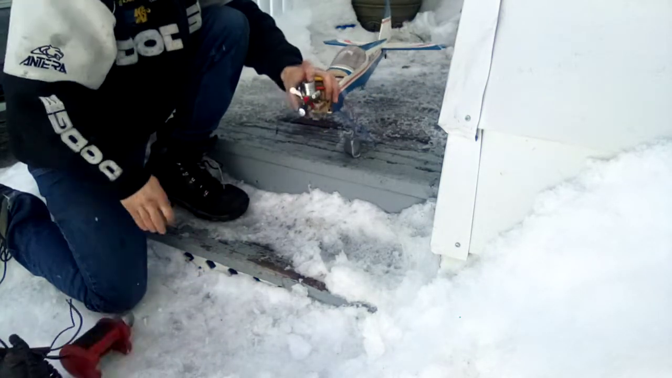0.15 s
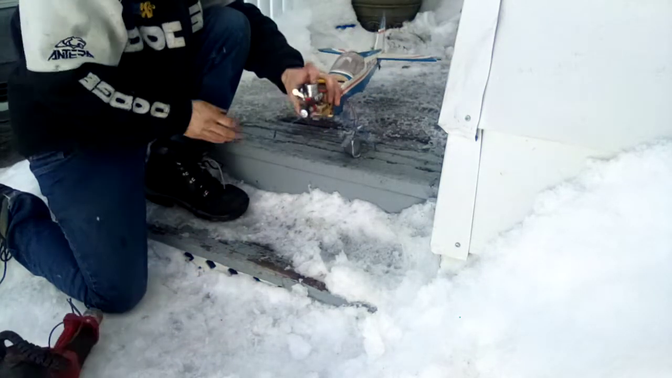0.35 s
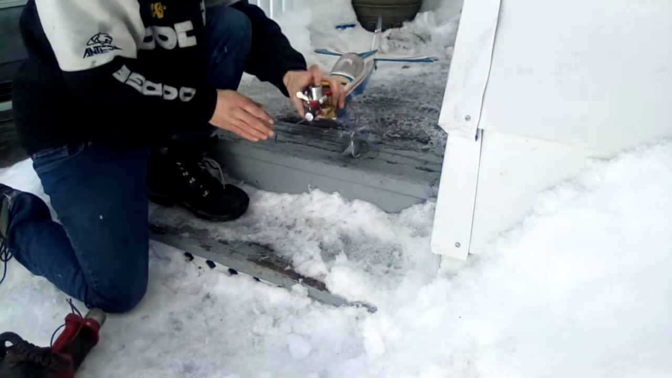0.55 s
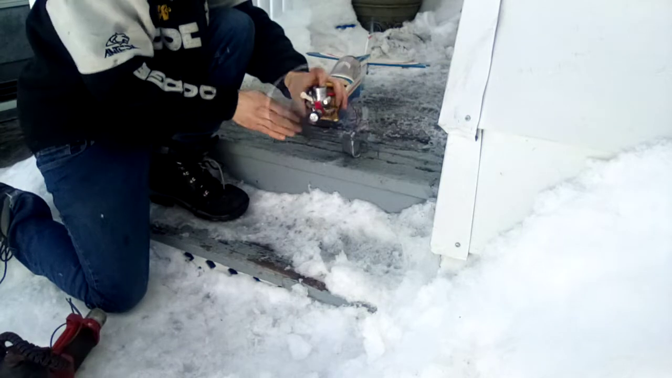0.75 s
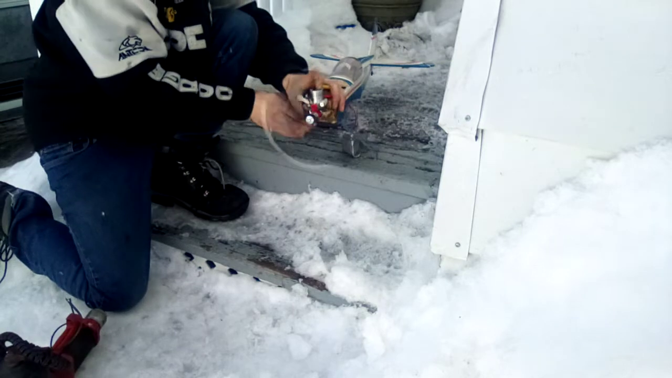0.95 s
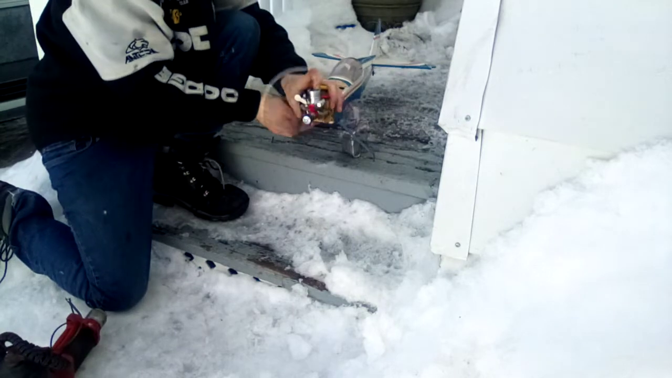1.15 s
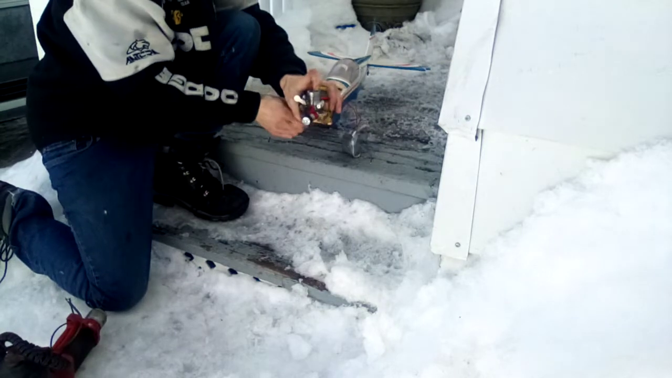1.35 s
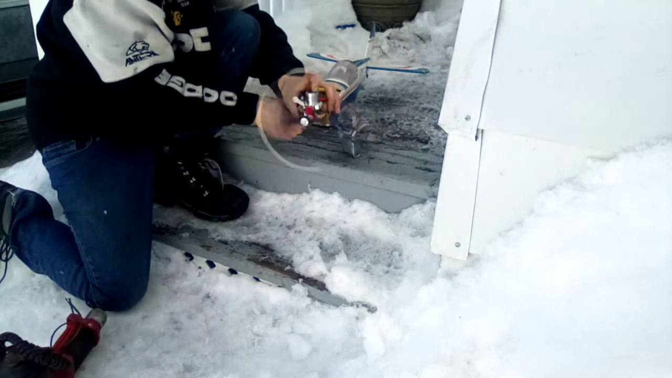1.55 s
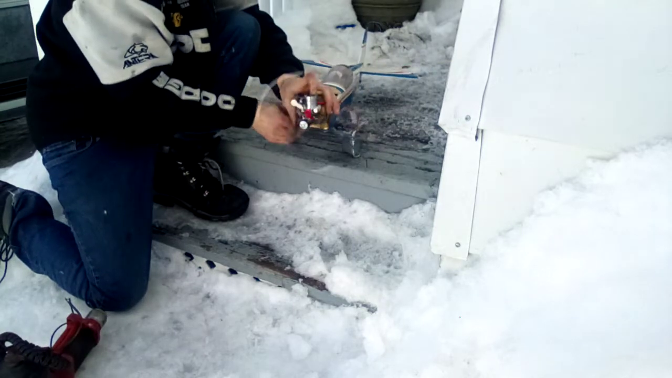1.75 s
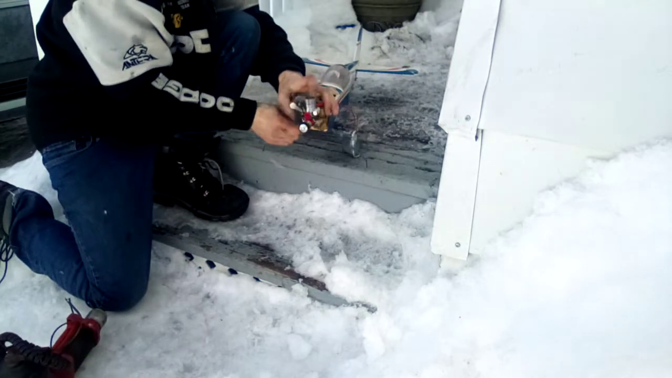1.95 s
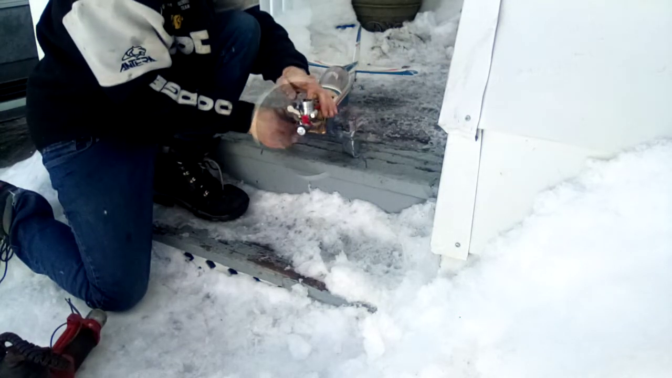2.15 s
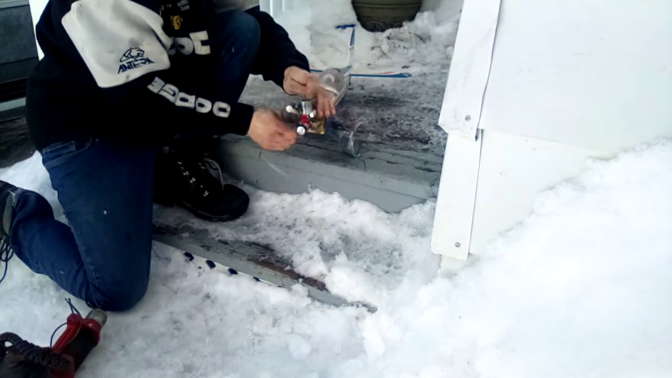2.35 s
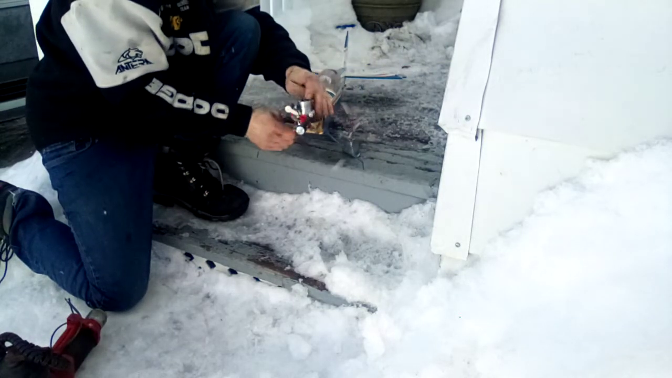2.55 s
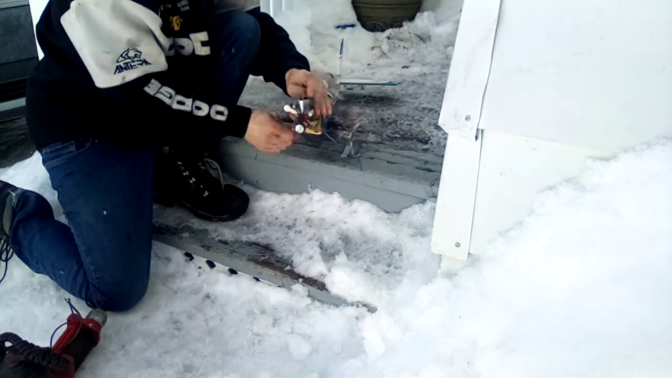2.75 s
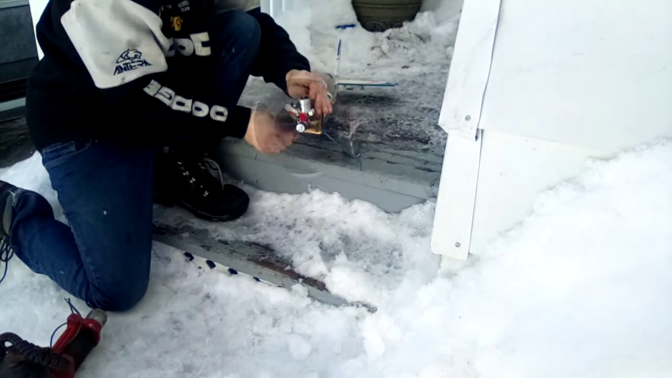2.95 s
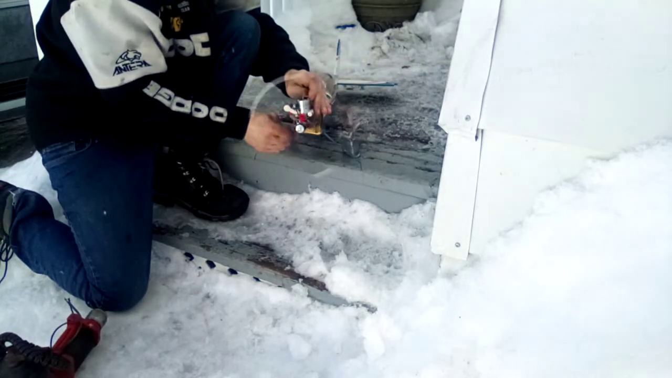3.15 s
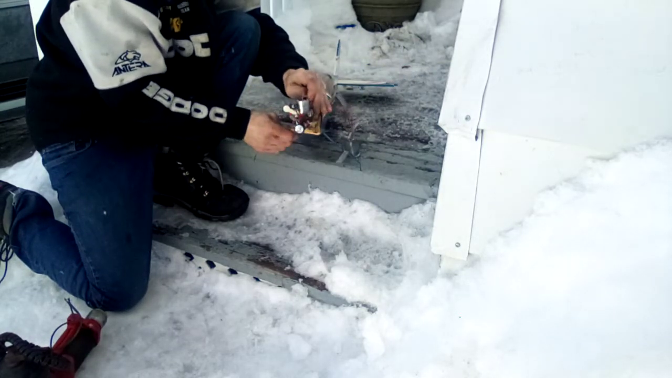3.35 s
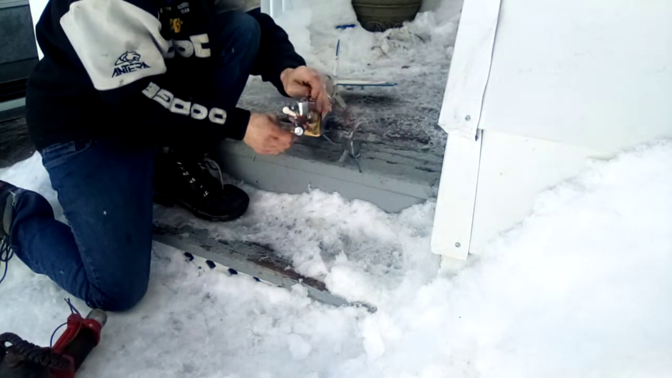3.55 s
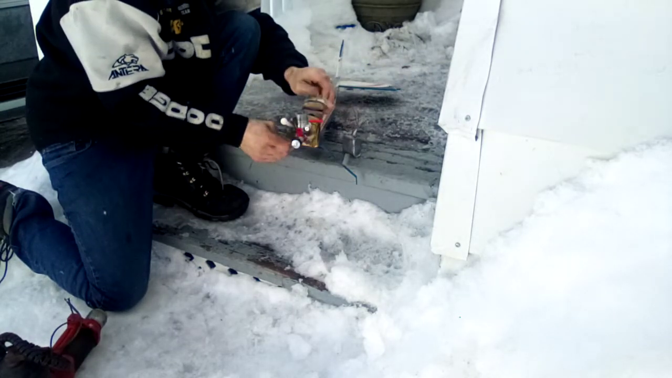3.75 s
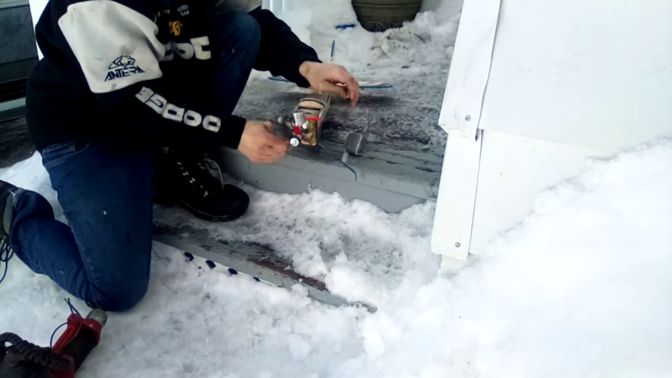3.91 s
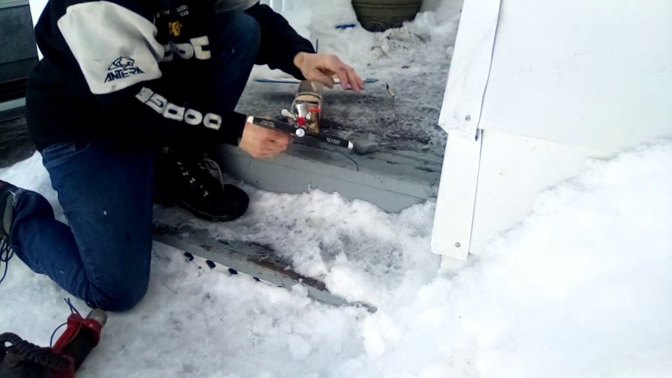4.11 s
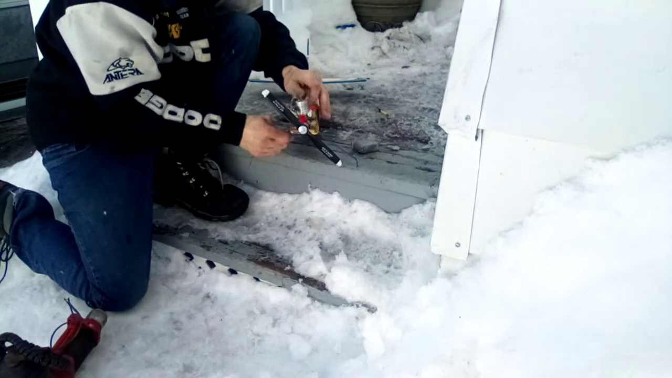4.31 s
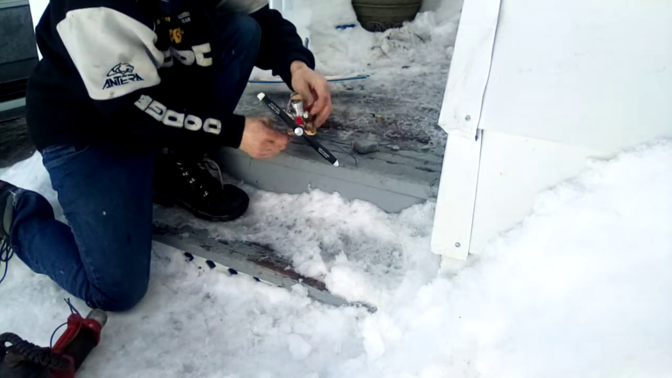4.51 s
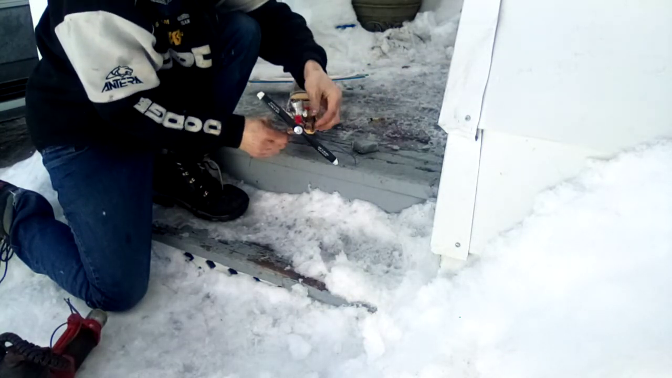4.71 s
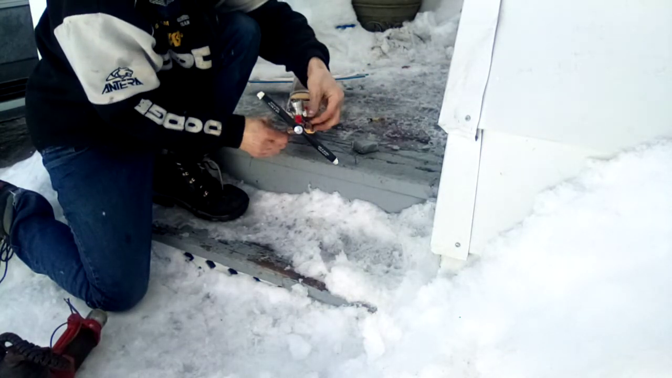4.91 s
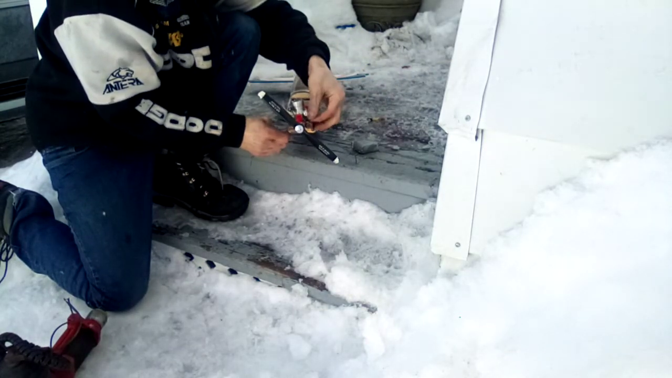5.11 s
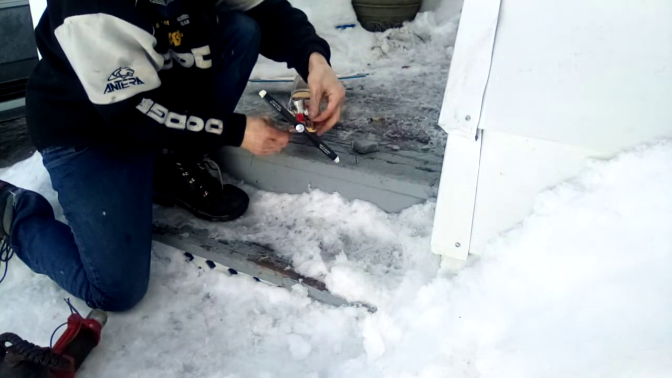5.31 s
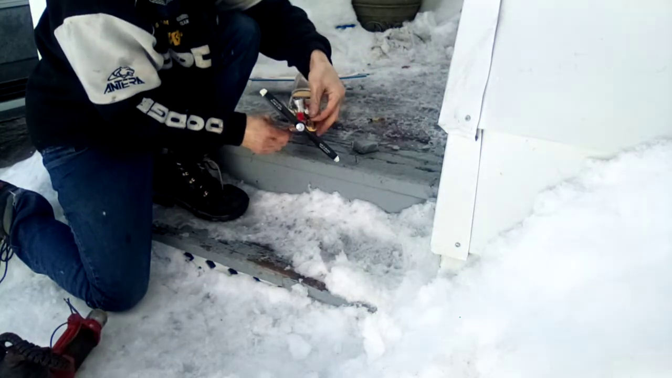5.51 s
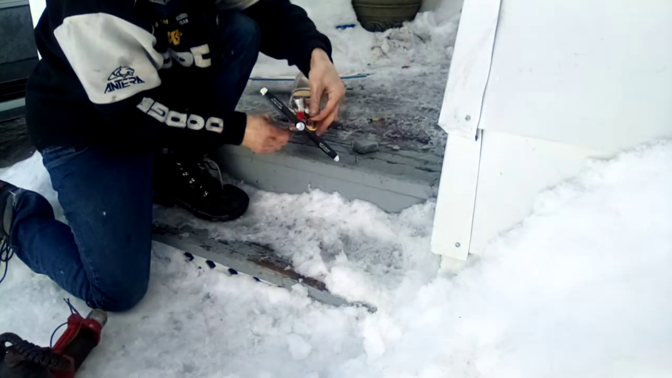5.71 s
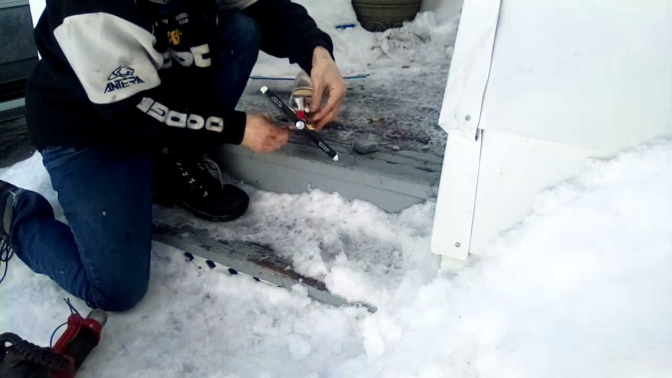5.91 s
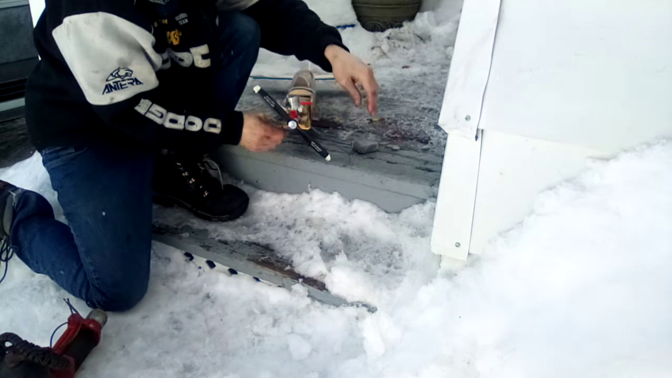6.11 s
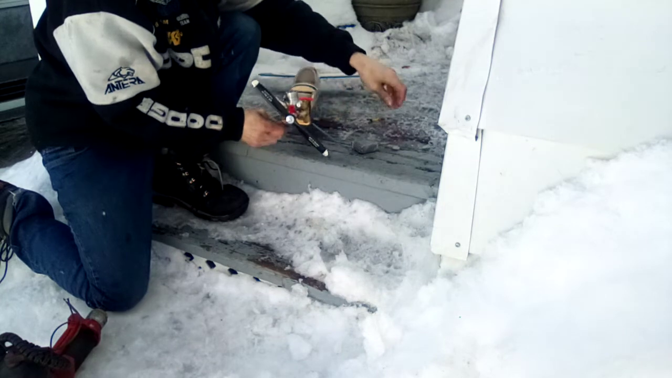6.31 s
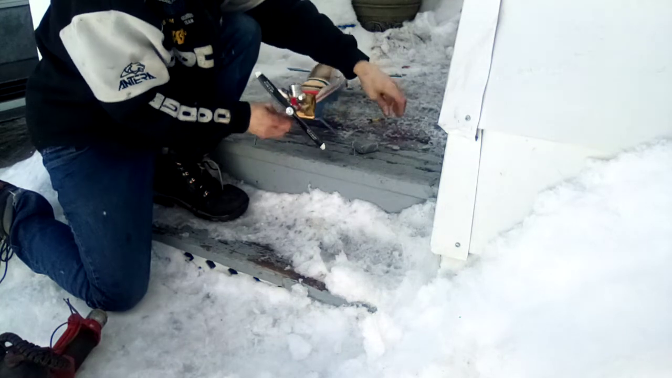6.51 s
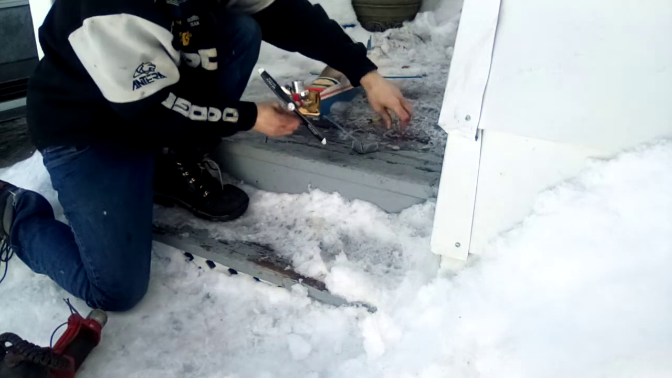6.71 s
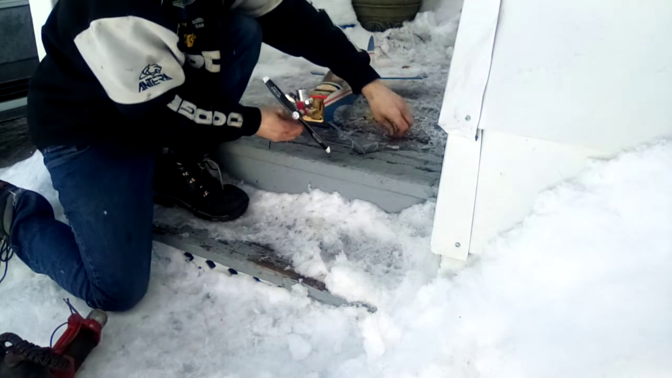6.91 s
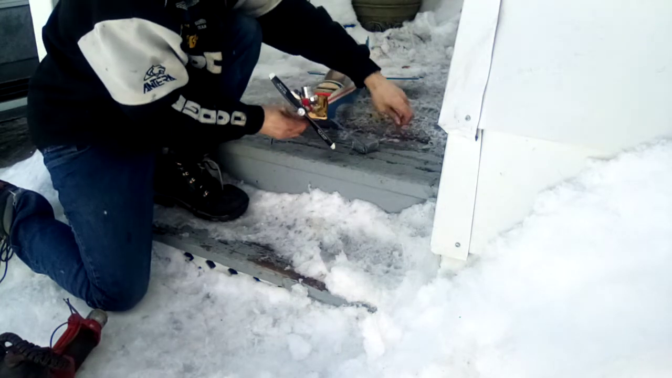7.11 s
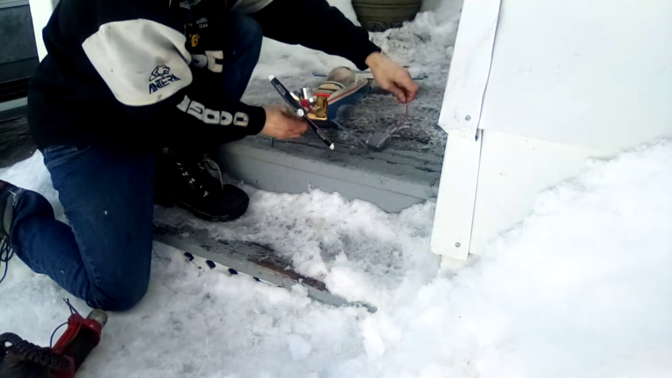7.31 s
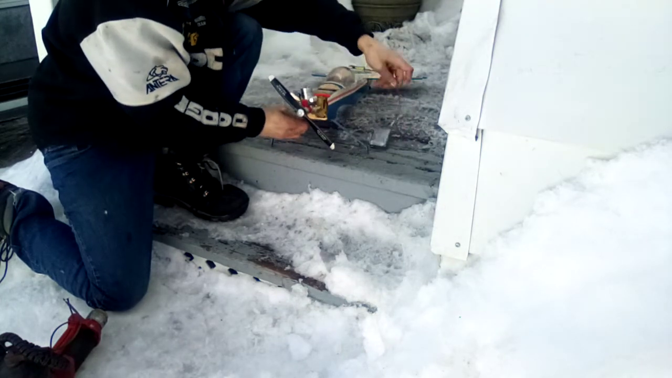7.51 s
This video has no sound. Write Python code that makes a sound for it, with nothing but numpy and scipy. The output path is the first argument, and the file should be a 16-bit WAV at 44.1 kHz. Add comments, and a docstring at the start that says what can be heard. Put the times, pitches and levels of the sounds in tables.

```python
"""A small two-stroke model aircraft engine runs rich on a snowy deck: sharp exhaust blasts, often every second
one weak. Pulses at each burn pass through a tail pipe, echoes and a ringing can; gas noise and propeller tones
follow the crank. A hand chokes it, and it coasts down in chuffs made of short fading tones and puffs of noise.
Then come a squeak from a bending whistle, clicks and scuffs from shaped noise, and knocks from ringing wood. A
quiet background noise, lifted slightly near 15 kHz, and a faint hum lie under everything."""
import sys
import numpy as np
from scipy import signal
from scipy.fft import rfft, irfft, next_fast_len
from scipy.io import wavfile
from scipy.ndimage import uniform_filter1d, map_coordinates

SR = 44100
rng = np.random.default_rng(int(sys.argv[2]) if len(sys.argv) > 2 else 0)


def generate_wav(signal):
    """Clip the signal to [-1, 1] and save it as 16-bit WAV at the path in sys.argv[1]."""
    frames = np.transpose(np.atleast_2d(signal))
    scaled = np.clip(frames, -1, 1) * 32767
    pcm = np.round(scaled).astype(np.int16)
    wavfile.write(sys.argv[1], SR, pcm)


N = 337806

# How fast the crankshaft spins. Each row: time in seconds, speed in turns per second.
SPEED = [(0.0, 102.38), (0.282, 97.4), (0.282, 99.04), (0.763, 90.43), (0.79, 92.71), (0.978, 92.06),
         (1.211, 85.52), (1.428, 91.73), (1.726, 81.58), (2.06, 85.44), (2.16, 90.12), (2.42, 88.79),
         (2.464, 86.91), (2.878, 84.76), (3.081, 88.88), (3.401, 84.85), (3.615, 89.17), (3.882, 80.2),
         (4.122, 17.22), (4.19, 1.0)]
CHOKE_S = 3.897  # the hand closes the intake, in seconds


def amp(db):
    """Turn dB into a plain factor."""
    return 10 ** (np.asarray(db) / 20)


def unit(x):
    """Scale a sound to rms 1."""
    return x / np.sqrt(np.mean(x ** 2) + 1e-20)


def curves(rows):
    """One value per sample for each column after the time."""
    s, *cols = np.transpose(rows)
    return [np.interp(np.arange(N) / SR, s, c) for c in cols]


def between(t0, t1, fade):
    """1 inside the span, 0 outside, with short ramps."""
    return np.interp(np.arange(N) / SR, [t0 - fade, t0, t1, t1 + fade], [0, 1, 1, 0])


def wobble(rate):
    """A smooth random curve with this many random points a second."""
    points = rng.standard_normal(int(N * rate / SR) + 4)
    return map_coordinates(points, [np.arange(N) * rate / SR])


def filtered(x, response):
    """Reshape x by a complex response given as a function of frequency."""
    m = next_fast_len(len(x) + 8192)
    f = np.fft.rfftfreq(m, 1 / SR)
    return irfft(rfft(x, m) * response(f), m)[:len(x)]


def noise(spectrum):
    """Noise of rms 1 with the given (Hz, dB) colour."""
    hz, db = np.transpose(spectrum)
    white = rng.standard_normal(N)
    return unit(filtered(white, lambda f: amp(np.interp(np.log(f + 1), np.log(hz + 1), db))))


def blend(spectra, hand):
    """Noise whose colour follows the hand from away (0) to near (1)."""
    return np.sqrt(1 - hand) * noise(spectra[0]) + np.sqrt(hand) * noise(spectra[1])


def band(f, hz, width):
    """One resonance that rings only after it is struck."""
    return 1j * f * width / (hz * hz - f * f + 1j * f * width)


def train(times, sizes):
    """Impulses that may fall between two samples."""
    at = times[:, None] * SR
    taps = np.floor(at) + np.arange(-7, 9)
    kernel = np.sinc(taps - at) * np.cos(np.pi * (taps - at) / 16) ** 2
    return np.bincount(taps.astype(int).ravel(), (sizes[:, None] * kernel).ravel(), N)[:N]


def add(out, s, sound):
    """Mix a short sound in at time s."""
    part = out[round(s * SR):][:len(sound)]
    part += sound[:len(part)]


def firings():
    """Time and strength (dB) of the burn in every turn; a poor burn also makes the next turns late."""
    # Stumbles, where every second turn burns badly.
    # Each row: first weak turn in seconds, number of weak turns, first loss in dB, last loss in dB.
    stumbles = [(.177, 1, -5, -7), (.238, 1, -2.5, -3.5), (.31, 2, -2.5, 0.5), (.371, 1, -5.5, -5.5),
                (.475, 2, -2, -2), (.527, 1, -2.5, -3), (.581, 5, -3, -2), (.689, 2, -10, -16),
                (.787, 1, -1.5, -3), (.863, 3, -16.5, -8), (.961, 5, -1.5, -6.5), (1.104, 7, -6.5, -2.5),
                (1.345, 3, -3, -5.5), (1.422, 2, -8, -13.5), (1.467, 1, -3, -3.5), (1.545, 9, -9, -9.5),
                (1.759, 2, -5.5, -4.5), (1.808, 2, -9, -6), (1.915, 3, -4.5, -2.5), (2.137, 1, -4, -3.5),
                (2.17, 2, -2.5, -2), (2.237, 4, -4.5, -4), (2.405, 7, -14.5, -4.5), (2.59, 2, -7.5, -4),
                (2.625, 8, -4.5, -6), (2.823, 1, -7, -10), (2.846, 3, -4, -1), (2.963, 2, -4.5, -7.5),
                (3.077, 8, -5.5, -2.5), (3.26, 6, -5.5, -7), (3.435, 2, -1.5, -1), (3.539, 14, -1, -10.5),
                (3.854, 2, -2, -12.5)]
    start_turn = -.9  # crank position at 0 s, in turns
    weak_scatter, choked_db = 0.21, -41  # spread as a share of a loss; what still burns once choked
    # delay in seconds that a lost burn costs; share of sag and of delay left a turn later
    lag_s, sag_kept, lag_kept = .00082, .7, .85
    turns = start_turn + np.cumsum(curves(SPEED)[0][:round(SPEED[-1][0] * SR)]) / SR
    times = np.interp(np.arange(int(turns[-1]) + 1), turns, np.arange(len(turns)) / SR)
    loss_db = np.zeros(len(times))
    for s, count, first_db, last_db in stumbles:
        weak = np.argmin(abs(times - s)) + 2 * np.arange(round(count))
        loss_db[weak] = np.linspace(first_db, last_db, len(weak))
    # the flywheel slows after a poor burn
    sag = signal.lfilter([0, 1 - sag_kept], [1, -sag_kept], 1 - amp(loss_db))
    times = times + lag_s * signal.lfilter([1], [1, -lag_kept], sag)
    loss_db = np.minimum(loss_db * rng.normal(1, weak_scatter, len(times)), 0)
    return times, np.where(times > CHOKE_S, choked_db, loss_db)


def exhaust(f, which):
    """Port to listener: tail pipe, then reflections (duller the longer their way) and the ringing can."""
    # The tail pipe, one row for hand away and one for hand near.
    # Each row: low mode in Hz, high mode in Hz, corner of the rounded front in Hz.
    pipe_rows = [(1080, 4790, 4300), (935, 4790, 4600)]
    # Reflections off deck, boot, hand and wall.
    # Each row: delay in milliseconds, gain with the hand away, gain with the hand near.
    echo_rows = [(0.18, 1.0, 0.83), (0.67, 0.49, 0.24), (0.84, 1.0, 0.86), (1.23, 0.35, 0.38),
                 (1.74, 0.22, 0.0), (1.86, 0.0, 0.63), (2.37, 0.45, 0.05), (3.05, 0.58, 0.44),
                 (3.68, 0.88, 0.39), (4.33, 0.73, 0.94), (4.92, 0.28, 0.0)]
    # Ringing of the silencer can.
    # Each row: pitch in Hz, width in Hz, level in dB with the hand away, level in dB with the hand near.
    can_rows = [(731, 158, 2, 3), (966, 60, -30, 3), (1335, 48, -2, -30), (1607, 111, 10, 5),
                (1773, 94, 8, -30), (2930, 456, 11, 5), (2520, 90, -30, 4), (3380, 260, -30, 0),
                (6050, 420, 0, 10)]
    low_hz, high_hz, front_hz = pipe_rows[which]
    pipe = band(f, low_hz, 500) * band(f, high_hz, 1375) / (1 + 1j * f / front_hz) ** 4
    echoes = sum(echo[1 + which] * np.exp(-2j * np.pi * f * echo[0] / 1000) / (1 + 1j * f * echo[0] / 2600)
                 for echo in echo_rows)
    can = sum(amp(mode[2 + which]) * band(f, *mode[:2]) for mode in can_rows)
    return pipe * (1 + echoes + can)


def exhaust_blasts(times, loss_db, hand):
    """A good burn leaves the port as a steep shock, a poor one as a later, rounder puff."""
    # The reaching arm throws the blast back. Each row: time in seconds, level in dB against the blast.
    arm_rows = [(.5, -25), (.7, -8.5), (1.04, -8.5), (1.12, -20.5), (1.9, -16.5), (2.15, -21.5)]
    arm_s = .00392  # delay of the arm's reflection, in seconds
    edge_scatter = 0.42  # some blasts are sharper than others
    weak_dulls = 1  # poor burns lose their edge
    scatter = rng.standard_normal((len(times), 3))
    missing = 1 - amp(loss_db)
    shock = train(times - .00015 + 1e-5 * scatter[:, 0], amp(1.2 * loss_db + .6 * scatter[:, 1]))
    puff = train(times + .0004, .33 * missing * (loss_db > -25))
    edge = train(times - .00015, (edge_scatter * scatter[:, 2] - weak_dulls * missing) * amp(1.2 * loss_db))
    sharp_edge = filtered(edge, lambda f: (1j * f / (1j * f + 2600)) ** 2)
    round_puff = filtered(puff, lambda f: 1 / (1 + 1j * f / 1500) ** 2)
    ports = shock + sharp_edge + round_puff
    grid = np.fft.rfftfreq(8192, 1 / SR)
    blasts = np.zeros(N)
    for which, share in enumerate([1 - hand, hand]):
        path = irfft(exhaust(grid, which))[:4096]
        blasts += signal.oaconvolve(ports * share, path)[:N]
    blasts = blasts / np.std(blasts[:4 * SR])
    thrown = filtered(blasts, lambda f: band(f, 1500, 1100) * np.exp(-2j * np.pi * f * arm_s))
    return blasts + amp(curves(arm_rows)[0]) * thrown


def gas_noise(since, burn, hand):
    """Turbulent exhaust gas and propeller wash: noise that swells at each burn and at each intake."""
    # Colour with the hand away, then near. Each row: frequency in Hz, relative level in dB.
    gas_spectra = [
        [(35, -54.5), (60, -20.5), (239, -34.5), (283, -23.5), (422, -20.5), (860, -6), (1450, -7), (1580, -10),
         (2030, -14.5), (2960, -9.5), (3810, -21), (4600, -9), (9000, -34), (11700, -70.5), (19800, -120)],
        [(35, -55), (60, -31), (207, -16), (255, -19.5), (388, -18), (955, -8.5), (1450, -8.5), (1610, -7),
         (1950, -14), (2450, -10), (3300, -6), (4000, -13), (6040, -13.5), (9000, -36), (11700, -60),
         (19800, -120)],
    ]
    intake = .6 * np.exp(-((since - .33) / 0.17) ** 2)
    swell = 1.0 + 0.28 * burn * np.exp(-since / 0.25) + intake
    gas = swell * amp(0.86 * wobble(150)) * blend(gas_spectra, hand)
    return amp(-13.5 + 3 * hand) * gas / np.std(gas)


def treble_hiss(since, burn, hand):
    """Intake and bearing hiss: it peaks at the blast and again when the intake opens."""
    # Colour with the hand away, then near. Each row: frequency in Hz, relative level in dB.
    hiss_spectra = [
        [(4410, -30.5), (7500, -4), (8820, -19.5), (9670, -5), (12100, -19), (13400, -14.5), (14900, 0.5),
         (16000, -7.5)],
        [(4120, -29.5), (7000, 7), (7580, -1), (8830, -10), (13200, -16), (14800, -7.5), (16000, -15.5)],
    ]
    flicker_db = 2.2  # unsteadiness of the hiss
    beats = 1.2 + 1.0 * burn * np.exp(-since / 0.15) + 0.88 * np.exp(-((since - .36) / 0.095) ** 2)
    return beats * burn ** 0.83 * amp(flicker_db * wobble(300)) * blend(hiss_spectra, hand)


def propeller_tones(angle):
    """Propeller and pumping tones at whole multiples of the shaft speed."""
    # Each row: multiple of the shaft speed, level in dB.
    blade_rows = [(1, -8), (2, -8.5), (3, 2.5), (4, -8), (5, -6.5), (6, -4)]
    smooth = uniform_filter1d(angle, size=2500)
    return sum(amp(db + 0.45 * wobble(10)) * np.sin(2 * np.pi * k * smooth) for k, db in blade_rows)


def thin_whistles(angle):
    """Thin wavering whistles at seventeen and nineteen times the shaft speed."""
    # Each row: time in seconds, level in dB against the blasts.
    whistle_rows = [(0, -17.5), (.6, -16), (1.04, -17.5), (1.08, -20.5), (3.9, -21.5)]
    level = amp(curves(whistle_rows)[0] + 2.5 * wobble(15))
    return level * sum(np.sin(2 * np.pi * k * angle) for k in (17, 19))


def engine(times, loss_db):
    """The running engine: blasts, gas, hiss and tones, all tied to the turning crank."""
    # Levels along the run. Each row: time in seconds, blast in dB, propeller in dB, treble hiss in dB.
    run_rows = [(0.03, -22, -45, -54.5), (0.9, -21.5, -41, -52), (1.2, -21.5, -41.5, -44.5),
                (1.76, -21.5, -40.5, -47.5), (2.07, -22, -37.5, -42), (2.44, -21, -38.5, -41.5),
                (3.79, -21, -38, -41.5), (3.92, -20.5, -45.5, -49.5)]
    # The hand closing in on the exhaust. Each row: time in seconds, nearness from 0 to 1.
    hand_rows = [(0, 0.03), (.6, 0.35), (1.2, 0.76), (1.9, 0.94), (2.4, 1), (3.9, 0.93)]
    blast_db, blade_db, hiss_db = curves(run_rows)
    hand = np.clip(curves(hand_rows)[0], 0, 1)
    angle = np.interp(np.arange(N) / SR, np.r_[-.0013, times], np.arange(len(times) + 1))
    since = angle % 1  # share of a turn since the last burn
    burn = amp(np.append(loss_db[:1], loss_db)[angle.astype(int)])
    running = between(0, 3.9, 0.039)
    gas = gas_noise(since, burn, hand) + thin_whistles(angle)
    exhaust_sound = amp(blast_db) * (exhaust_blasts(times, loss_db, hand) + gas * running)
    hiss = amp(hiss_db) * treble_hiss(since, burn, hand) * running
    return exhaust_sound + hiss + amp(blade_db) * propeller_tones(angle) * between(0, 3.93, 0.081)


def changing_colour(x):
    """The tone colour changes over time: four colourings, each lifting or dipping its own bands, blend in turn."""
    # Each row: centre in Hz, width in Hz, then the change in dB in the first, second, third and fourth colouring.
    colour_rows = [(95.7, 31, 6, 1, -1, -3), (397, 60, -3.5, -2, -11, -11), (602, 57, -3.5, 4.5, 4.5, 6),
                   (1078, 460, 1.1, -1, 2, 0.5), (1500, 110, 1, 6, 2, -0.3), (1650, 76, 0.5, -5, 4, 0.9),
                   (1796, 46, 4.5, -1.5, 2.5, 4), (1893, 28, -6, 9.5, 3.5, -0.7),
                   (2564, 200, -1.4, -10, -1, -2), (2033, 120, 0.5, -2.5, -5.5, -12.5),
                   (2370, 170, 1.6, 6.5, 4.5, 2.3), (2690, 120, -1.8, 5, 3, -5),
                   (2980, 150, 3.5, 3.5, 4, -2.15), (3790, 200, -2.5, -4.5, -4.5, -6),
                   (4586, 260, 1, 0.5, -11, -4), (5160, 200, 2.5, 3.5, -0.3, 1.6),
                   (5280, 140, 0.3, 0.9, -9, -4.5), (5520, 370, -1, -8.5, -12, -4.5),
                   (6000, 340, -6, -13, -1.7, 1.5), (6400, 490, 5, 6, -3, 1.4),
                   (7000, 930, 0.4, -3.5, -4, -7), (7800, 160, -0.6, -0.5, 5, 4.5),
                   (7820, 300, -2, -2.5, -5, -7), (8150, 180, -3, 1, 6, 5), (8796, 900, -2, -0.5, -4.5, -4),
                   (9700, 230, -2, 7, 5.5, 2.5)]
    # Each row: time in seconds, number of the colouring from 0 to 3.
    turn_rows = [(0, 0), (.58, 0), (.74, 1), (1.55, 1), (1.86, 2), (2.1, 2), (2.17, 3), (8, 3)]
    colouring, = curves(turn_rows)
    f = np.fft.rfftfreq(4096, 1 / SR)
    out = np.zeros(N)
    for k in range(4):
        bands = [1 + (amp(row[2 + k]) - 1) * band(f, *row[:2]) for row in colour_rows]
        share = np.clip(1 - abs(colouring - k), 0, 1)
        out += share * signal.oaconvolve(x, irfft(np.prod(bands, axis=0)))[:N]
    return out


def background():
    """Steady background noise, its colour lifted slightly near 15 kHz, swaying slightly, and a faint two-pitch
    hum far off."""
    # Colour of the background noise. Each row: frequency in Hz, relative level in dB.
    background_spectrum = [(18, -33.5), (30, -3), (106, 2), (319, -12), (415, -8), (540, -14), (937, -14.5),
                           (2410, -23.5), (5740, -24.5), (8300, -35.5), (13300, -40), (14800, -26),
                           (16000, -30.5)]
    # The hum. Each row: pitch in Hz, level in dB.
    hum_rows = [(417, -82), (480, -85.5)]
    t = np.arange(N) / SR
    hum = sum(np.sqrt(2) * amp(db + 2.5 * wobble(11)) * np.sin(2 * np.pi * hz * t) for hz, db in hum_rows)
    return amp(-70 + 1.2 * wobble(5.1)) * noise(background_spectrum) + hum


def coasting(times):
    """Unburnt charges chuff out of the port, the intake throat rings between; air hisses at both openings."""
    # Tones of one chuff. Each row: pitch in Hz, level in dB, time to fade by 60 dB in seconds.
    chuff_rows = [(233, 9, 0.0084), (980, 3.5, 0.012), (2457, -4.5, 0.01), (2788, -11.5, .025),
                  (3480, -11, 0.013), (5700, -6.5, 0.018), (4500, -17.5, .012), (10000, -34.5, 0.016)]
    # Air and scraping as the shaft stops. Each row: time in seconds, level in dB.
    coast_rows = [(3.88, -30.5), (3.96, -26.5), (4.05, -30.5), (4.158, -47), (4.21, -50.5), (4.248, -41.5),
                  (4.32, -76)]
    # After the choke. Each row: time in seconds, chuff in dB, intake gulp in dB, crankcase boom in dB.
    choked_rows = [(3.9, -26, -25, -23), (3.94, -15.5, -16.5, -15), (3.975, -17.5, -15.5, -15),
                   (3.99, -12.5, -14.5, -18.5), (4.03, -8, -8, -14.5), (4.06, -8, -10.5, -18.5),
                   (4.09, -7.5, -20, -6.5), (4.14, -0.5, -19.5, -23)]
    # Air spits past the piston as the shaft rocks to rest.
    # Each row: start in seconds, length in seconds (half of the whole swell), level in dB.
    spit_rows = [(4.176, .004, -59.5), (4.201, .005, -53.5), (4.236, .004, -59.5), (4.245, .008, -53),
                 (4.252, .005, -56), (4.262, .006, -61), (4.291, .003, -64.5)]
    gulp_turn = .29  # the intake opens this share of a turn after the exhaust
    out, jets, t = np.zeros(N), np.zeros(N), np.arange(SR // 10) / SR
    chuff_db, gulp_db, boom_db = curves(choked_rows)
    level_db, = curves(coast_rows)
    last = times[times > CHOKE_S]
    for s, turn_s in zip(last, np.diff(last, append=SPEED[-1][0])):
        at, gulp_s = round(s * SR), s + gulp_turn * turn_s
        rise = (1 - np.exp(-t / (.04 * turn_s))) ** 2  # slower turns open the port more slowly
        ring = sum(amp(level + rng.normal(0, 2.2) - 60 * t / t60) * np.sin(2 * np.pi * hz * t * rng.normal(1, 0.02))
                   for hz, level, t60 in chuff_rows)
        boom = amp(boom_db[at] - 60 * t / 0.032) * np.sin(2 * np.pi * 510 * t)
        add(out, s - .05 * turn_s, (amp(chuff_db[at]) * ring + boom) * rise)
        gulp = amp(gulp_db[round(gulp_s * SR)] - 60 * t / 0.028) * np.sin(2 * np.pi * 1700 * t)
        add(out, gulp_s, gulp * (1 - np.exp(-t / 0.0033)))
        add(jets, s, amp(level_db[at] - 7.5 - 60 * t / .022) * rise)
        add(jets, gulp_s, amp(level_db[at] - 8 - 60 * t / .025) * rise)
    for s, length, db in spit_rows:
        add(jets, s, amp(db) * np.hanning(round(2 * length * SR)))
    air = noise([(100, -17.0), (400, -1.5), (1200, -8.0), (3000, -11.5), (6000, -16), (7500, -28), (16000, -50.5)])
    fizz = noise([(3000, -26.5), (6000, -1.5), (8000, -7), (10000, -3.5), (13000, -12), (15200, -4.0), (16000, -3.5)])
    out = filtered(out, lambda f: (1j * f / (1j * f + 90)) ** 2)  # a small port radiates no deep bass
    return out + amp(level_db + 1.8 * wobble(90)) * air * between(3.91, 4.3, 0.026) + jets * fizz


def handling():
    """Clicks: a tick, a crack, a noisy ring at each object's centre, a dull and a bright rattle; and rustle."""
    # Each row: start in seconds, level in dB, centre in Hz.
    click_rows = [(4.175, -35.5, 1190), (4.177, -46.5, 6500), (4.202, -31, 2920), (4.202, -28.5, 1200),
                  (4.205, -40, 420), (4.212, -35.5, 970), (4.235, -37.5, 920), (4.237, -45.5, 3900),
                  (4.251, -45.5, 2600), (4.341, -52, 4930), (4.347, -61, 3200), (4.348, -58.5, 6200),
                  (4.465, -62.5, 9000), (4.667, -67, 8500), (4.676, -53, 4540), (4.782, -51.5, 7800),
                  (4.892, -70, 14000), (4.942, -68.5, 9040), (5.012, -54, 3740), (5.019, -55.5, 4200),
                  (5.023, -67, 5560), (5.12, -59.5, 896), (5.296, -55, 1870), (5.56, -36.5, 4290),
                  (5.633, -66.5, 4690), (5.646, -62.5, 6330), (5.732, -58, 10630), (5.773, -67.5, 11600),
                  (5.803, -61.5, 1620), (6.048, -52, 2680), (6.055, -54.5, 2320), (6.074, -57, 1926),
                  (6.087, -53.5, 1460), (6.109, -61.5, 870), (6.147, -62, 5660), (6.162, -58.5, 1950),
                  (6.166, -59, 1180), (6.193, -62, 1450), (6.194, -67.5, 880), (6.255, -49, 5440),
                  (6.287, -61, 1080), (6.369, -64, 4000), (6.462, -56.5, 5000), (6.487, -29, 3700),
                  (6.724, -41, 2610), (6.751, -48.5, 3030), (6.753, -49, 5800), (6.81, -56.5, 900),
                  (6.833, -65, 2880), (6.99, -51, 950), (6.994, -54.5, 1190), (7.091, -54, 5600),
                  (7.313, -42.5, 3090), (7.314, -47, 1250), (7.355, -55, 1020), (7.379, -58, 3000),
                  (7.399, -60, 5780), (7.593, -64.5, 6150), (7.626, -51, 4550)]
    # Side modes of small hard parts. Each row: multiple of the centre, level in dB.
    side_modes = [(.81, 0), (1.17, -1.5), (1.38, -7.5), (.62, -13)]
    faint_db = -72  # the softest touch, from which hardness counts
    # fade of a faint 1 kHz click in seconds; shortening per dB of hardness; share kept an octave up
    ring_s, ring_hard, ring_kept = 0.15, 0.019, 0.5
    out, t = np.zeros(N), np.arange(SR // 6) / SR
    for s, db, hz in click_rows:
        hard_db, octaves = db - faint_db, np.log2(hz / 1000)  # octaves count from 1 kHz
        t60 = np.clip(ring_s / (1 + ring_hard * hard_db) * ring_kept ** octaves, .045, .25)
        # small things have less dull rattle and tick harder; harder blows have more crack and less ring
        dull_db = -19.5 - 14 * octaves
        bright_db = -21.5 + 1.5 * octaves + 0.11 * hard_db
        tick_db = -20 + 3.5 * octaves - .4 * hard_db
        crack_db = -6 + 0.37 * hard_db
        ring_db = -0.5 - 0.098 * hard_db
        hiss = rng.standard_normal((5, len(t)))
        # the thin tick of first contact
        tick = unit(filtered(hiss[4], lambda f: band(f, 15000, 5000))) * amp(tick_db - 60 * t / .03)
        snap = filtered(hiss[0] * amp(-60 * t / .004), lambda f: band(f, hz, 1.3 * hz) ** 3)
        crack = snap / abs(snap).max() * amp(crack_db)
        modes = [(hz, 4)]
        for ratio, level in side_modes:
            modes.append((hz * ratio * rng.normal(1, 0.041), level + 4.5 * min(octaves - 1.5, 0)))
        wider = 1 + 0.064 * hard_db  # harder blows blur the pitch
        ring = filtered(hiss[1], lambda f: sum(amp(g) * band(f, c, (30 + .035 * c) * wider) ** 2 for c, g in modes))
        ring = unit(ring) * amp(ring_db - 60 * t / t60)
        dull = unit(filtered(hiss[2], lambda f: band(f, 540, 1100) ** 3)) * amp(dull_db - 60 * t / 0.091)
        bright = unit(filtered(hiss[3], lambda f: band(f, 4000, 4500) ** 5)) * amp(bright_db - 60 * t / .055)
        add(out, s, amp(db) * (tick + crack + ring + dull + bright) * (1 - np.exp(-t / 0.0001)))
    # sleeve and snow
    cloth = noise([(2000, -26.0), (3500, -18.5), (5700, -4.5), (7500, -17.0), (10000, -47.5)])
    return out + amp(-92.5 + 2.7 * wobble(44) + 3.5 * wobble(6)) * cloth * between(3.9, 8, .02)


def scuffs():
    """Sleeve and fingers rubbing: grainy noise that swells and fades around a centre."""
    # Each row: start in seconds, centre in Hz, level in dB.
    scuff_rows = [(4.351, 1197, -63.5), (4.55, 2920, -66), (5.641, 6340, -69.5), (6.149, 1660, -70),
                  (6.655, 5370, -64), (6.729, 3200, -56), (6.76, 595, -48.5), (6.895, 5540, -68.5),
                  (6.991, 1100, -60), (7.06, 5800, -64.5), (7.32, 3190, -62.5), (7.329, 600, -64),
                  (7.352, 910, -58), (7.334, 5200, -65.5), (7.382, 5700, -64.5), (7.615, 4990, -67)]
    scuff_s = 0.042  # time scale of the swell; the peak comes after a third of it
    out = np.zeros(N)
    grain = np.pad(amp(3 * wobble(200)), (0, SR), mode="edge")
    for s, hz, db in scuff_rows:
        u = np.arange(round(2.1 * scuff_s * SR)) / (scuff_s * SR)
        hiss = rng.standard_normal(len(u)) * grain[round(s * SR):][:len(u)]
        rub = unit(filtered(hiss, lambda f: band(f, hz, 0.4 * hz) ** 2))
        add(out, s, amp(db) * rub * 6 * u * np.exp(-3 * u))
    return out


def squeak():
    """Rubber slipping on metal: a breathy whistle that grips hard a few times and then sings with overtones."""
    # Each row: time in seconds, pitch in Hz, level in dB, overtone level in dB, breathiness from 0 to 1.
    squeak_rows = [(4.48, 1360, -67, -25, 1), (4.52, 1290, -59, -32, 1), (4.57, 1310, -55, -36, 0.4),
                   (4.585, 1340, -53, -30, 0.2), (4.612, 1210, -56, -22, 0.3),
                   (4.626, 1224, -45.5, -3, 0.1), (4.645, 1198, -49, -16, 0.04),
                   (4.68, 1220, -85, -15, 0.35)]
    # Moments of hard grip. Each row: start in seconds, rough length in seconds, added level in dB.
    grip_rows = [(4.578, 0.0061, 15.5), (4.592, 0.0083, 9), (4.612, 0.02, 6), (4.639, 0.021, 2)]
    hz, db, over_db, breath = curves(squeak_rows)
    breath = np.clip(breath, 0, 1)
    t, phase = np.arange(N) / SR, 2 * np.pi * np.cumsum(hz) / SR
    grip = 1.0 + sum(amp(g) * np.exp(-((t - s - d / 2) / (0.25 * d)) ** 2) for s, d, g in grip_rows)
    flutter = 1 - breath + breath * wobble(170)
    overtones = np.sin(2 * phase) + 0.34 * np.sin(3 * phase) + 0.15 * np.sin(4 * phase)
    return amp(db) * grip * flutter * (np.sin(phase) + amp(over_db) * overtones) * between(4.5, 4.68, 0.029)


def knocks():
    """The airframe knocks on the deck: every contact rings the modes of the wood anew."""
    # The wooden airframe. Each row: pitch in Hz, level in dB, time to fade by 60 dB in seconds.
    wood_rows = [(135, -14.5, 0.071), (247.7, -15, 0.055), (404, -5.5, .06), (500, 1.5, 0.054),
                 (634, 1, 0.073), (894, 1.5, 0.074), (1073, 5, 0.04), (1388, 1, 0.03), (1740, -6, 0.033),
                 (1940, -9, 0.032), (2550, -6, .025), (3270, -9, 0.019), (4200, -18, 0.019)]
    # Each row: start in seconds, level in dB, tilt in dB per octave (a hard edge up, a soft push down).
    knock_rows = [(6.7235, -46, 4), (6.7271, -52, 5), (6.7382, -49.5, -7), (6.7459, -42, 8.5),
                  (6.7536, -46.5, 1), (6.7605, -51, -6), (6.8258, -68, -1), (7.312, -51, 12),
                  (7.3183, -56, -1), (7.338, -65, -11), (7.3489, -63, -11), (7.3547, -58, -1),
                  (7.378, -58, 3.5)]
    out, t = np.zeros(N), np.arange(SR // 5)[:, None] / SR
    hz, level_db, t60 = np.transpose(wood_rows)
    for s, db, tilt_db in knock_rows:
        spread_db, detune = rng.normal([[0], [1]], [[2.5], [.02]], (2, len(hz)))
        sizes = amp(db + level_db + tilt_db * np.log2(hz / 1000) + spread_db - 60 * t / t60)
        modes = sizes * np.sin(2 * np.pi * hz * detune * t) * (1 - np.exp(-t / 0.00071))
        add(out, s, modes.sum(1))
    return out


def porch(x):
    """A short answer from deck and wall: a fading burst of noise smears the sound."""
    t = np.arange(SR // 5) / SR
    tail = filtered(rng.standard_normal(len(t)), lambda f: band(f, 1800, 4000)) * amp(-60 * t / 0.13)
    return x + amp(-13.0) * signal.fftconvolve(x, tail / np.linalg.norm(tail))[:N]


def scene():
    """Mix the engine in its changing colour, its coasting, the handling on the porch and the background."""
    times, loss_db = firings()
    running = changing_colour(engine(times, loss_db))
    touched = porch(handling() + scuffs() + squeak() + knocks())
    return (running + coasting(times) + touched + background())[None]


def record(dry):
    """The microphone drops deep bass and saturates gently on the loudest blasts; 16 kHz and up is cut."""
    x = filtered(dry[0], lambda f: (1j * f / (1j * f + 60)) ** 2)
    x = x / (1 + abs(x / .7) ** 6) ** (1 / 6)
    return filtered(x, lambda f: f < 16000)[None]


dry = scene()
out = record(dry)
generate_wav(out)
```